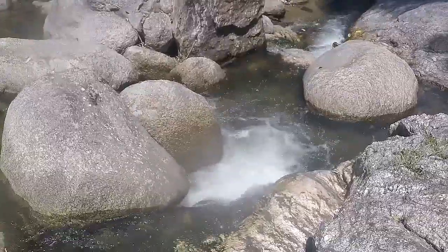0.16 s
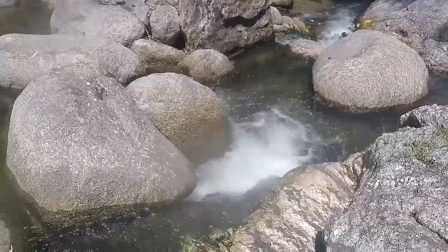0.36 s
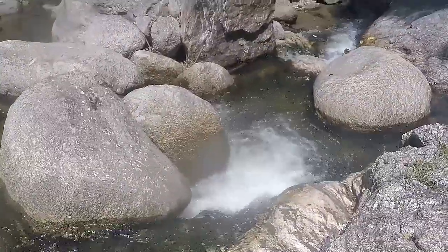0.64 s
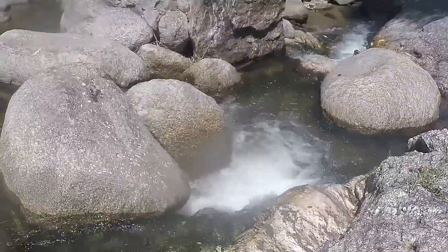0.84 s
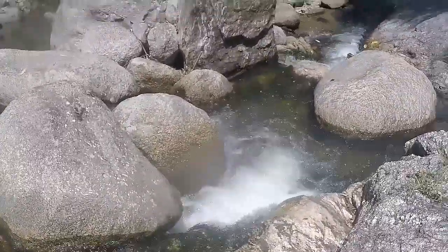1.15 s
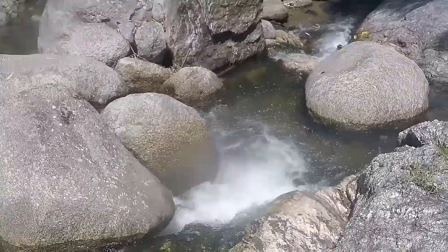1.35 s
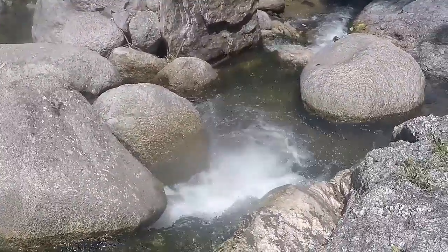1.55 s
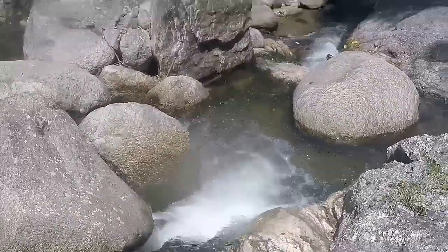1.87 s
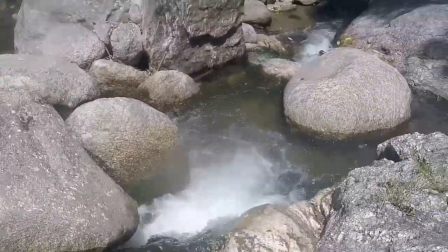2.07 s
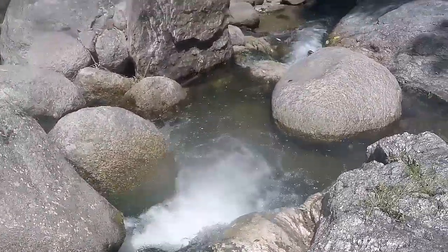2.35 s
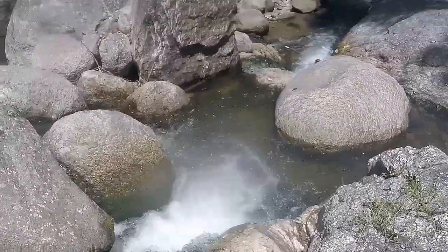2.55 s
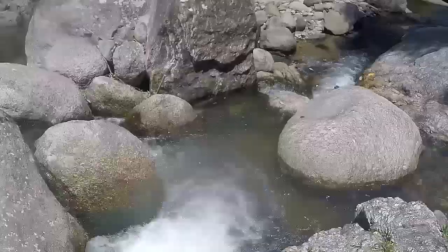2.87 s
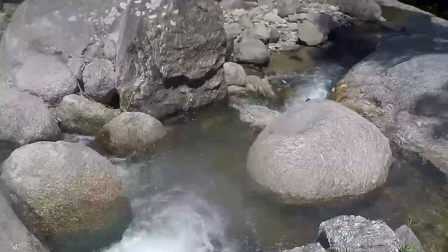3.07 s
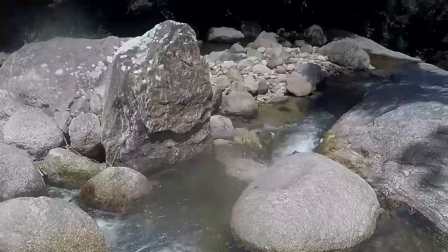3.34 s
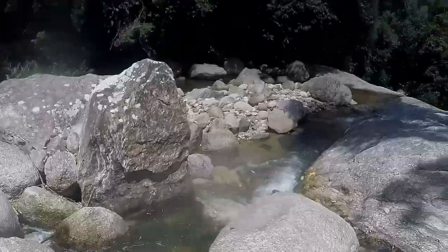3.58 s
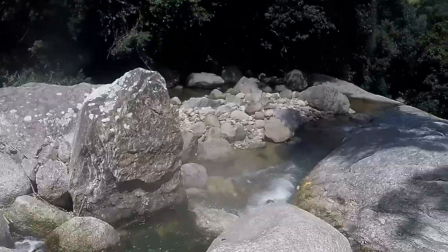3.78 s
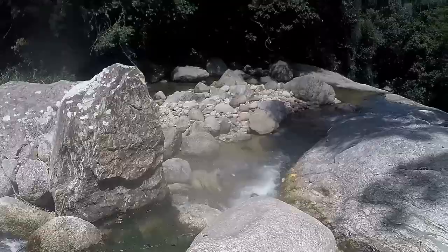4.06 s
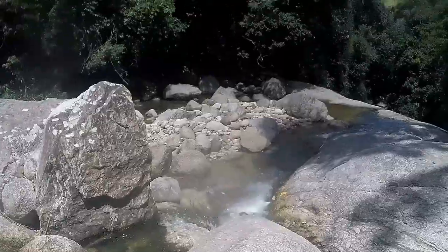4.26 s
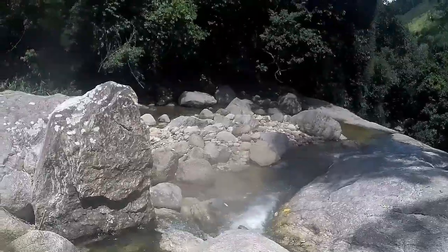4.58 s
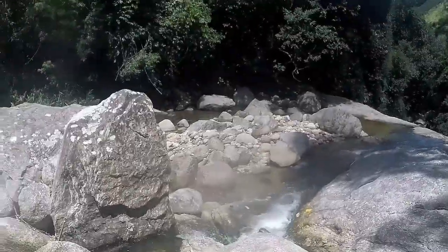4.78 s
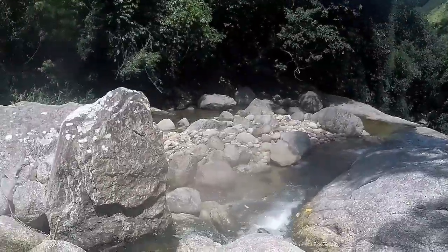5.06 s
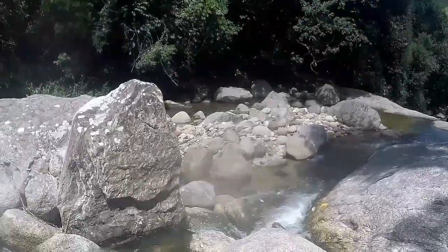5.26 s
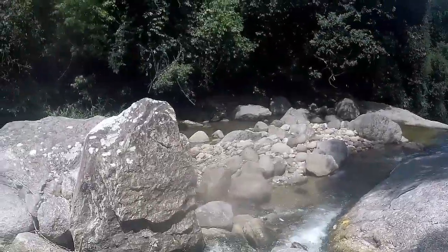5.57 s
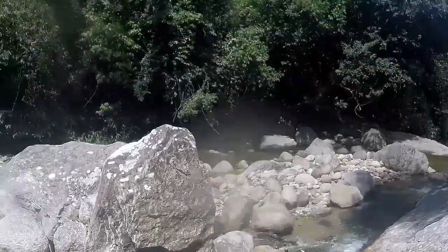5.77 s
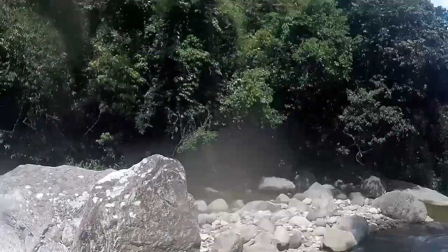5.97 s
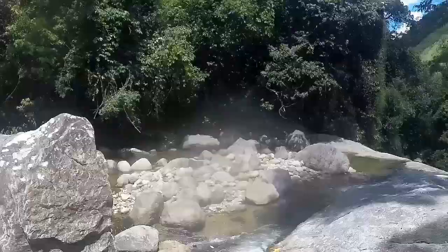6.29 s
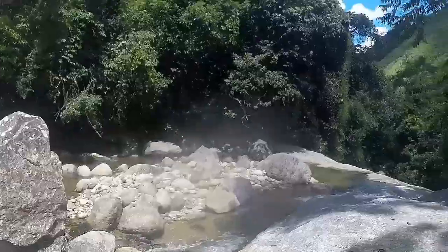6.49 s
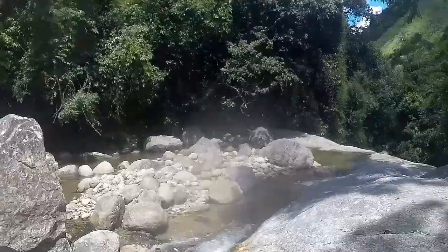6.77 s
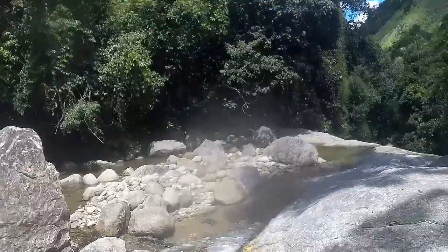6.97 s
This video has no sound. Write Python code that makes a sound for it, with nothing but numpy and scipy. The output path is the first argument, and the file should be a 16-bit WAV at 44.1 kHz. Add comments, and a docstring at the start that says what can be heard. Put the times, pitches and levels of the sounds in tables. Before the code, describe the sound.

Outdoors beside a rocky stream, water rushes continuously over a small cascade, foaming, gurgling and spattering, with an occasional tiny bubble plink. Wind hits the single hand-held microphone in uneven low gusts and quick puffs, strongest toward the end. There is a soft handling thump near the start, a tick past the middle and a short cluster of light knocks late on. The water grows slightly duller as the microphone tilts away.

```python
"""A stream pours down a small cascade between boulders: a dense rush of hissing foam, ringing bubbles
and crackling spray, with a few single plinks on top. The water changes colour as a hand-held camera
tilts up from the cascade to look upstream and on to the trees. Wind eddies rumble and puff on its
single microphone, and the hand knocks lightly on the housing."""
import sys
import numpy as np
from scipy import signal
from scipy.fft import rfft, irfft
from scipy.io import wavfile
from scipy.ndimage import uniform_filter1d

SR = 44100
rng = np.random.default_rng(int(sys.argv[2]) if len(sys.argv) > 2 else 0)


def store_wav(level_fs):
    """Save 16-bit WAV to argv[1]."""
    pcm = np.round(np.clip(np.atleast_2d(level_fs), -1, 1) * 32767)
    wavfile.write(sys.argv[1], SR, pcm.T.astype(np.int16))


N = 314433
TIME = np.arange(N) / SR
FREQS = np.maximum(np.arange(N // 2 + 1) * SR / N, 1)

# EQ of the rushing water: (frequency [Hz], gain [dB])
WATER_EQ = [(40, 3), (130, 0.5), (230, -0.9), (380, -5), (1000, -0.5), (2200, -4), (2900, -8), (4300, -7.5),
            (6600, -12), (7800, -19), (10200, -20), (11800, -27), (15200, -28.7)]
# fader ride on the water, ahead of its EQ: (time [s], level [dB], hiss shelf [dB])
WATER_RIDE = [(0, -38.0, 0.5), (.8, -37.5, 0.5), (1.7, -36.5, -1.1), (2.9, -37, 0.5), (3.6, -37, -0.8),
              (4.3, -36.5, -0.9), (5.8, -36.5, -0.6), (6.4, -36.5, -1.6), (7.13, -37, -1.3)]
# peaks and dips that the housing adds in each direction:
# (centre [Hz], width [Hz], facing the cascade [dB], facing upstream [dB], facing the trees [dB])
HOUSING_EQ = [(664, 229, -1.3, -2.3, -4.3), (1009, 303, -0.7, 1.0, 2.3), (1336, 172, -4.1, -0.5, -4.2),
              (1619, 308, 5.0, 3.6, 3.3), (1930, 204, 5.1, 3.6, 1.3), (2466, 338, 4.5, 4.1, -0.2),
              (2895, 260, 0.8, -1.0, -2.5), (3163, 253, 6.2, 3.6, 1.5), (4029, 260, -1.1, -2.9, -3.8),
              (4683, 428, 4.9, 3.8, 1.6), (5051, 193, -2.3, -0.6, -1.8), (5448, 386, 6.0, 4.1, 3.7),
              (6924, 508, 2.3, 5.6, 4.5)]
# where the camera points, held to 0..2 in use: (time [s], aim [0 cascade, 1 upstream, 2 trees])
CAMERA_AIM = [(0, -0.5), (2.7, 0.14), (3.6, 1.1), (4.6, 1), (6.0, 0.86), (6.25, 1.5), (7.13, 5)]
# single bubbles above the rush: (time [s], starting pitch [Hz], peak level [dB])
BUBBLE_PLINKS = [(.857, 7700, -55), (1.409, 1895, -41), (2.209, 1490, -37), (3.969, 4190, -48),
                 (4.507, 4900, -42)]
# tone of the wind's slow eddies: (frequency [Hz], relative level [dB])
RUMBLE_EQ = [(10, -4.5), (18, 5.5), (28, 2.5), (48, -2), (65, -14), (90, -23.5), (130, -35.5), (220, -40),
             (500, -72)]
# the bed of breeze, before lift and wavering: (time [s], level [dB])
BREEZE_RIDE = [(0.0, -44), (0.3, -45.5), (0.77, -41.5), (1.85, -42.5), (1.97, -40.5), (2.6, -43),
               (2.92, -37.5), (4.09, -45), (5.6, -41.5), (6.19, -37.5), (6.43, -44.5), (7.13, -39.5)]
# buffets on top of the breeze: (crest time [s], level [dB], width [s])
WIND_BUFFETS = [(1.015, -33, 0.045), (1.366, -27.5, 0.055), (1.56, -33, 0.052), (1.869, -30, 0.048),
                (2.125, -27.5, 0.072), (2.89, -28.5, 0.11), (3.04, -28.5, .07), (3.586, -32, 0.034),
                (3.865, -28, 0.072), (3.962, -28, 0.027), (4.61, -27.5, 0.1), (4.76, -30.5, .06),
                (5.182, -36, 0.043), (5.587, -26.5, 0.025), (5.662, -28, 0.03), (5.774, -30.5, .05),
                (6.10, -26, 0.085), (6.2, -24, 0.056), (6.352, -28.5, 0.03), (6.489, -28, 0.028),
                (6.76, -35, 0.13)]
# sudden puffs of wind: (start time [s], crest level [dB], length [s])
WIND_PUFFS = [(0.176, -36.5, 0.053), (2.123, -43, 0.075), (2.916, -45, 0.12), (3.282, -38, 0.19),
              (3.52, -39, 0.06), (4.745, -39, 0.036), (5.168, -45, 0.033), (5.914, -32.5, 0.025),
              (6.467, -38.5, 0.038), (6.845, -40, 0.021)]
# tone of the puffs' quicker eddies: (frequency [Hz], relative level [dB])
FLUTTER_EQ = [(30, -13), (72, 4), (105, -6), (160, -17), (250, -22), (500, -48)]
# the hand on the housing: (time [s], thump drive [dB], contact hardness as cutoff [Hz], tick drive [dB])
HAND_KNOCKS = [(0.5858, -22, 223, -81), (4.515, -39, 400, -43), (5.991, -26, 400, -65),
               (6.0156, -25, 280, -34), (6.102, -19, 720, -66)]
# resonances of the knocked housing: (frequency [Hz], gain [dB], time to fall 60 dB [s])
HOUSING_MODES = [(60, -1, 0.11), (111, 2.5, 0.019), (270, -5.5, 0.015), (513, -2, 0.012), (905, 0, 0.0066)]


def water(bubble_share=0.25, spray_share=0.33, surge_db=0.37, spatter_db=2.0):
    """Foam hisses, bubbles ring in the mids, and bursts of spray crackle on top."""
    bubble_band = 1 / (1 + (380 / FREQS) ** 8) / (1 + (FREQS / 7800) ** 8)
    spray_power = spray_share / (1 + (4000 / FREQS) ** 2)
    foam_power = 1 - bubble_share * bubble_band - spray_power   # foam fills out a flat spectrum
    foam = coloured(rng.standard_normal(N), 10 * np.log10(foam_power))
    drops = rms_one(grains(per_s=6000, spread_db=3.5) * from_db(spatter_db * drift(50)))
    spray = coloured(drops, 10 * np.log10(spray_power))
    gurgle = np.sqrt(bubble_share) * bubbles(per_s=4000, spread_db=4.0, cycles=24)
    rush = foam + spray + gurgle
    # the hiss grows when the white water is close and in view
    hiss_gain = from_db(in_time(WATER_RIDE, column=2))
    rush += (hiss_gain - 1) * filtered(rush, 2400, "high", order=1)
    return rush * from_db(in_time(WATER_RIDE) + surge_db * drift(20))


def bubbles(per_s, spread_db, cycles, count=36):
    """Bubbles of all sizes ring for some cycles each; small ones are more common. Even power per Hz."""
    out = np.zeros(N)
    pitches = np.geomspace(400, 7500, count)
    for hz, span_hz in zip(pitches, np.gradient(pitches)):
        births = grains(per_s * np.sqrt(hz) / np.sqrt(pitches).sum(), spread_db)
        out += np.sqrt(2 * span_hz / SR) * rms_one(ring(births, hz, cycles / hz))
    return out


def through_housing(sound):
    """The water's EQ plus the housing's colour, which crossfades between directions as the camera tilts."""
    aim = np.clip(in_time(CAMERA_AIM), 0, 2)
    out = np.zeros(N)
    for view in range(3):
        ripple_db = sum(dbs[view] * bell(FREQS, hz, width) for hz, width, *dbs in HOUSING_EQ)
        crossfade = np.maximum(1 - abs(aim - view), 0)
        out += crossfade * coloured(sound, spectrum_db(WATER_EQ) + ripple_db)
    return out


def plinks(t60=0.044, rise_per_s=1.8):
    """A bubble rings briefly and bends up in pitch as it nears the surface."""
    out = np.zeros(N)
    for start, hz, db in BUBBLE_PLINKS:
        age = np.maximum(TIME - start, 0)
        phase = 2 * np.pi * hz * age * (1 + rise_per_s * age / 2)
        out += from_db(db) * np.exp(-np.log(1000) * age / t60) * np.sin(phase)
    return out


def wind(eddy_s=0.0615, lift_db=2.5, waver_db=2, waver_per_s=13):
    """Slow eddies press on the microphone: a wavering breeze, and buffets that swell and fall evenly."""
    eddies = evened(coloured(rng.standard_normal(N), spectrum_db(RUMBLE_EQ)), eddy_s)
    power = from_db(in_time(BREEZE_RIDE) + lift_db + waver_db * drift(waver_per_s)) ** 2
    for crest, db, width in WIND_BUFFETS:
        power += from_db(db) ** 2 * bell(TIME, crest, width)
    return eddies * np.sqrt(power)


def puffs(eddy_s=0.033):
    """A sudden puff swells quickly and sheds smaller, faster eddies."""
    envelope = np.zeros(N)
    for start, db, length in WIND_PUFFS:
        progress = np.maximum(TIME - start, 0) / (length / 3)   # 1 at the crest
        envelope += from_db(db) * progress * np.exp(1 - progress)
    flutter = coloured(rng.standard_normal(N), spectrum_db(FLUTTER_EQ))
    return envelope * evened(filtered(flutter, 530, "low"), eddy_s)


def knocks(tick_decay_s=0.0016):
    """A soft contact thumps the housing; a hard edge adds a short tick."""
    push, tick_envelope = np.zeros(N), np.zeros(N)
    for start, thump_db, hardness_hz, tick_db in HAND_KNOCKS:
        click = np.zeros(N)
        click[round(start * SR)] = from_db(thump_db)
        push += filtered(click, hardness_hz, "low")
        age = np.maximum(TIME - start, 0)
        tick_envelope += from_db(tick_db) * (TIME >= start) * np.exp(-age / tick_decay_s)
    thump = sum(from_db(db) * ring(push, hz, t60) for hz, db, t60 in HOUSING_MODES)
    tick = filtered(2 * tick_envelope * rng.standard_normal(N), [800, 5200], "band", order=3)
    return thump + tick


def from_db(db):
    """Decibels to gain."""
    return 10 ** (np.asarray(db) / 20)


def rms_one(x):
    """Scale to unit power."""
    return x / np.sqrt(np.mean(x ** 2) + 1e-20)


def evened(x, span_s):
    """Hold the power of a noise near 1, so that its level follows the gust alone."""
    return x / np.sqrt(np.abs(uniform_filter1d(x ** 2, int(span_s * SR))) + 1e-20)


def bell(x, centre, width):
    """A bell curve of height 1; width spans its 1/e points."""
    return np.exp(-(2 * (x - centre) / width) ** 2)


def in_time(rows, column=1):
    """One column of an automation curve at every sample."""
    points = np.array(rows)
    return np.interp(TIME, points[:, 0], points[:, column])


def spectrum_db(points):
    """Join EQ points along a log frequency axis."""
    hz, db = np.transpose(points)
    return np.interp(np.log(FREQS), np.log(hz), db)


def coloured(x, db):
    """Apply an EQ curve."""
    return irfft(rfft(x) * from_db(db), N)


def filtered(x, hz, kind, order=2):
    """Causal low-, high- or band-pass."""
    return signal.sosfilt(signal.butter(order, hz, kind, fs=SR, output="sos"), x + 1e-18)


def drift(rate):
    """Random modulation with spread 1, changing about rate times a second."""
    return rms_one(irfft(rfft(rng.standard_normal(N)) / (1 + (FREQS / rate) ** 2), N))


def ring(clicks, hz, t60):
    """A unit click sets a decaying sine of height 1 ringing."""
    decay = np.exp(-np.log(1000) / (t60 * SR))
    step = 2 * np.pi * hz / SR
    feedback = [1, -2 * decay * np.cos(step), decay * decay]
    return signal.lfilter([0, decay * np.sin(step)], feedback, clicks + 1e-18)


def grains(per_s, spread_db):
    """Clicks at random moments, many small and a few large."""
    out = np.zeros(N)
    onsets = np.flatnonzero(rng.random(N) < per_s / SR)
    size_draw, sign_draw = rng.random((len(onsets), 2)).T
    size = np.minimum(-np.log(1 - size_draw), 4)
    out[onsets] = from_db(spread_db * size) * np.sign(sign_draw - 0.5)
    return out


def scene():
    """Water, wind and handling noise, mixed in mono."""
    return (through_housing(water()) + plinks() + wind() + puffs() + knocks())[None]


def record(dry, cutoff_hz=15400):
    """A steep high cut on the whole mix."""
    return signal.sosfilt(signal.ellip(10, 0.1, 80, cutoff_hz, fs=SR, output="sos"), dry)


dry = scene()
out = record(dry)
store_wav(out)
```